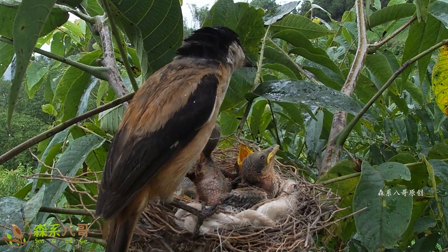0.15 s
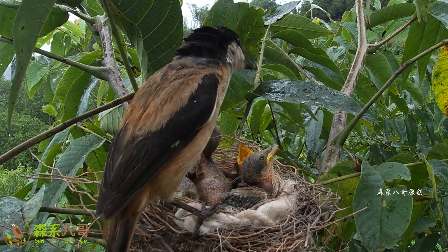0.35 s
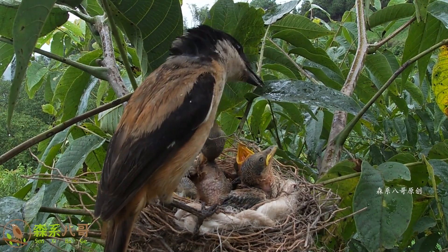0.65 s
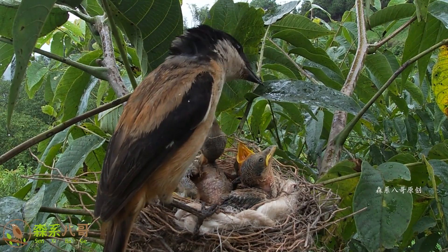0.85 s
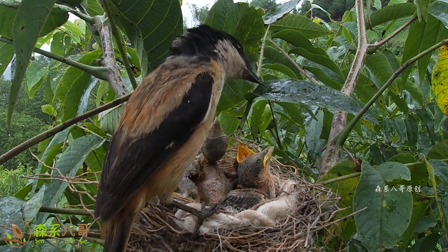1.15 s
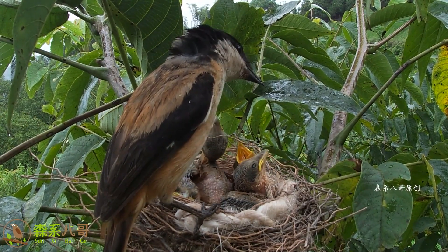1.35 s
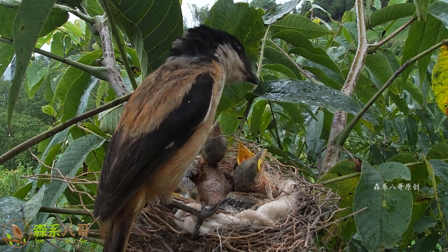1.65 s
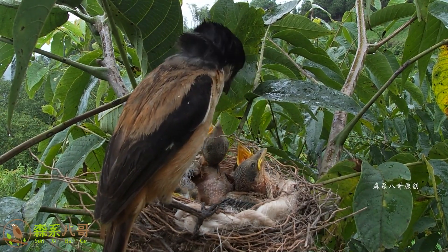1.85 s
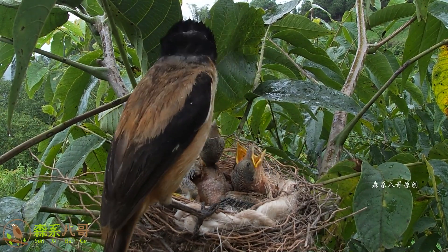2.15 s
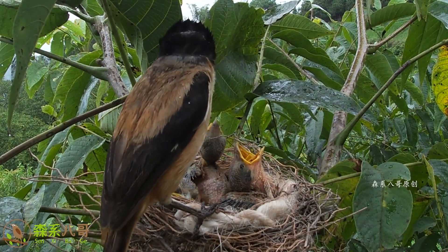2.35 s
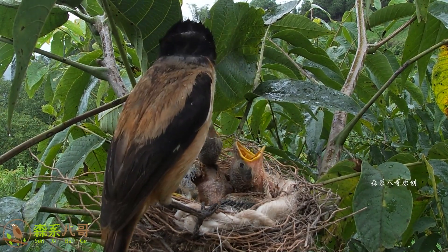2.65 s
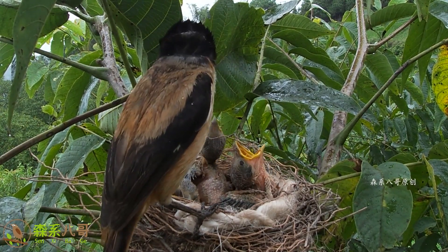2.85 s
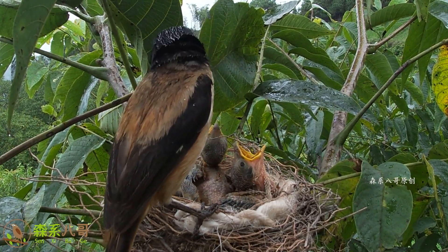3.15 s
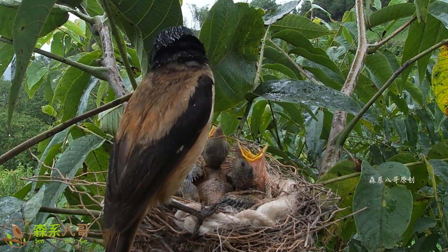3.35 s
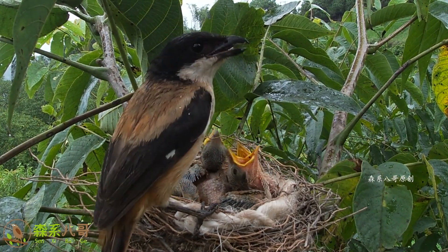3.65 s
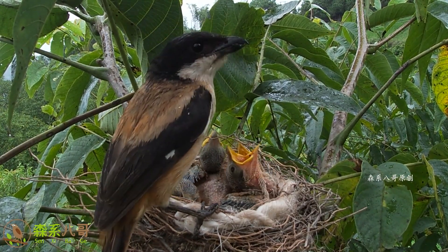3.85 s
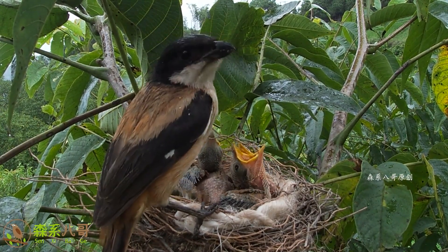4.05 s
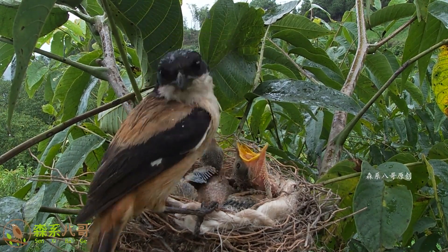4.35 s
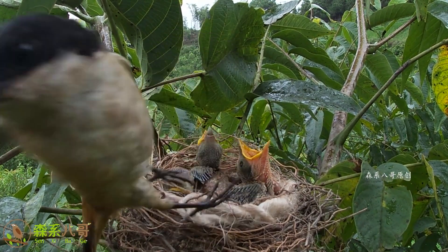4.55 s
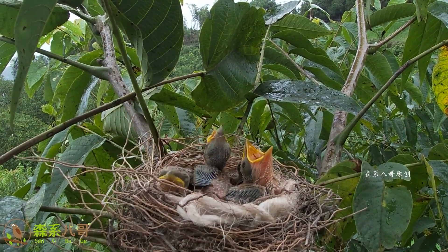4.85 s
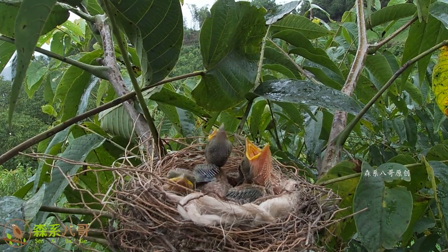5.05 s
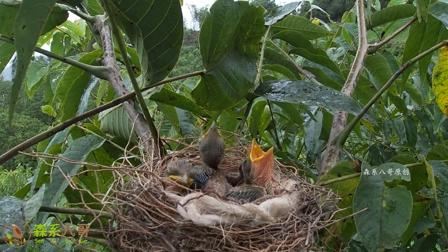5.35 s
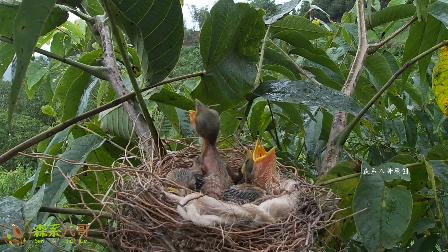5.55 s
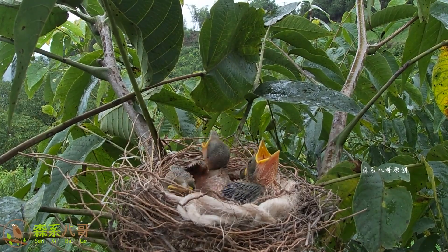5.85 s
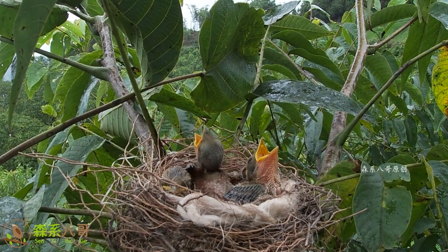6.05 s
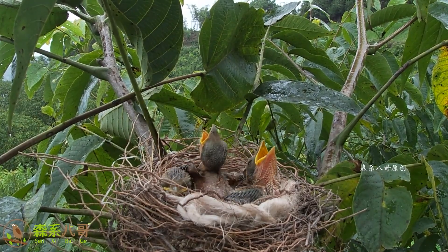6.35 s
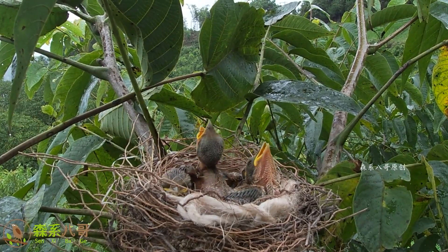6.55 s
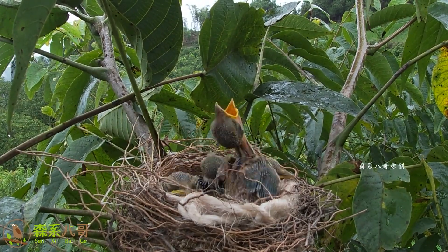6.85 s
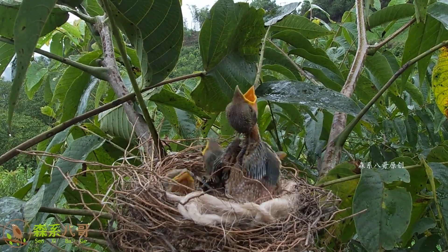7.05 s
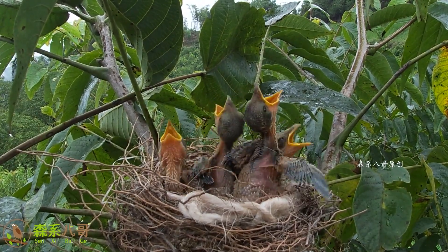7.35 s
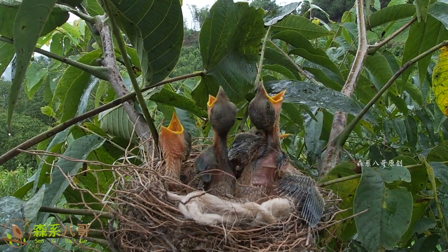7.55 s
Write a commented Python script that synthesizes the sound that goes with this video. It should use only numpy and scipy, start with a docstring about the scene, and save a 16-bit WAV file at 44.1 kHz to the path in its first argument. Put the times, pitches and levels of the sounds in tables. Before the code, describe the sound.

Several nestlings cheep shrilly and continuously in overlapping arched whistles, while a parent's departure brings hard mount knocks and a low wing buffet.

```python
"""Nestlings begging in a tree

Several thin whistles arch up and fall, overlapping: gliding sines with an octave partial and breath noise.
The parent leaves: low noise and damped swings buffet the microphone, the branch knocks the camera mount
(damped modes) and the mount shudders (low noise). Twigs and wings tick as short grains, a far bird holds
one note; foliage echoes the whistles, the ticks and the far bird, over a hiss and a low drone of noise."""
import sys
import numpy as np
from scipy import signal
from scipy.fft import rfft, irfft, next_fast_len
from scipy.io import wavfile
from scipy.ndimage import uniform_filter1d, map_coordinates

SR = 44100
rng = np.random.default_rng(int(sys.argv[2]) if len(sys.argv) > 2 else 0)


def bounce(signal):
    """Save signal as a 16-bit WAV file at the path given by the first command-line argument."""
    frames = np.transpose(np.atleast_2d(signal))
    limited = np.clip(frames, -1, 1)
    pcm = np.round(limited * 32767).astype(np.int16)
    wavfile.write(sys.argv[1], SR, pcm)


N = 340011

# Outdoor levels. Each row: time in seconds, drone level in dB, hiss level in dB.
OUTDOOR_LEVELS = [(0.0, -62, -51.5), (7.56, -83.5, -53), (7.71, -76, -55.5)]
# Hiss spectrum. Each row: frequency in Hz, relative density in dB per Hz.
HISS_SPECTRUM = [(24, -45), (40, 0), (86, -19.5), (145, 2.5), (298, -5.5), (527, -6), (804, 0.5),
                 (1490, 1.5), (3300, 0), (4130, -3), (5290, -5), (9360, -11.5), (10900, -27.5),
                 (12600, -30.5), (15000, -49)]
# Far bird's note. Each row: time in seconds, level in dB.
FAR_BIRD_LEVEL = [(5.94, -70), (5.96, -58), (6.08, -58), (6.11, -86)]
# Clear ticks: twig snaps, and three of wing rustle near 4.67 s.
# Each row: start in seconds, relative level in dB, centre in Hz.
CLEAR_TICKS = [(0.622, -33, 5500), (0.7028, -30, 2800), (1.3707, -31, 5500), (1.8514, -37, 1680),
               (2.0448, -37, 2090), (2.2255, -33, 5440), (3.0759, -38.5, 1636), (4.7463, -33, 6000),
               (4.467, -32.5, 2950), (4.637, -40.5, 1300), (4.668, -37.5, 990), (4.697, -40, 1200),
               (5.172, -36.5, 2100), (0.681, -36, 2820), (2.236, -30.5, 3030), (2.701, -35.5, 2500),
               (5.5758, -39.5, 1320), (6.1469, -38.5, 1600), (6.2213, -39.5, 1660), (7.054, -40.5, 1200)]
# Air on the microphone. Each row: time in seconds, level in dB.
BUFFET_LEVEL = [(4, -84), (4.9, -38.5), (5.5, -57.5), (5.9, -57.5), (6.5, -79), (7.2, -68), (7.71, -51)]
# Single pushes of air. Each row: start in seconds, relative level in dB.
AIR_PUSHES = [(4.66, -31), (4.739, -33), (4.898, -30.5), (5.03, -23.5), (5.071, -24.5), (6.9, -50),
              (7.167, -42.5), (7.41, -53), (7.535, -39.5), (7.572, -35)]
# Two spells of mount shudder, a list each. Each row: time in seconds, level in dB.
SHUDDER_SPELLS = [
    [(4.62, -66), (4.7, -49.5), (4.86, -37.5), (4.97, -58), (5.05, -46.5), (5.16, -49), (5.45, -64)],
    [(7.47, -64.5), (7.55, -50.5), (7.71, -61.5)],
]
# Blows on the mount. Each row: start in seconds, relative level in dB, bright modes in dB, deep modes in dB.
MOUNT_BLOWS = [(0.244, -42, -5, -8), (0.389, -48, 9.5, -26), (1.034, -42, -14, -8.5),
               (2.231, -37.5, -0.5, -18), (2.703, -37, 5.5, -20), (4.203, -61.5, -10, 18),
               (4.783, -20.5, 1, 2), (4.842, -27, -6, 1), (4.863, -31.5, -4, 3.5), (4.883, -35, 2, -12),
               (4.934, -40, -4, -8), (5.003, -27, -12, 2), (7.467, -42, -19, -26)]
# Mount resonances. Each row: mean frequency in Hz, relative level in dB, t60 in seconds.
MOUNT_MODES = [(108.6, 9, 0.12), (243.6, -7, 0.19), (567, -2, 0.082), (701, -2, 0.069), (922, 1, 0.03),
               (1655, 2, 0.036), (1860, 6.5, 0.021)]
# Throat resonances. Each row: frequency in Hz, gain in dB.
THROAT_GAIN = [(2500, -8.5), (3000, -4.5), (3300, -4.5), (3650, -7), (4100, -3), (4700, -1), (5400, -5),
               (6000, -5), (6750, -9.5), (7150, -6), (8000, -13), (12000, -50)]
# Octave partial. Each row: frequency of the partial in Hz, strength in dB.
OCTAVE_GAIN = [(5000, -13), (6650, -10), (7050, -16), (7500, -17), (8000, -22), (12000, -65)]
# Breath spectrum. Each row: frequency in Hz, relative density in dB per Hz.
BREATH_SPECTRUM = [(2500, -18), (5000, 1), (7600, -3), (9000, -43)]
# Vocal strain. Each row: time in seconds, pitch slipping 0-1, noise share 0-1.
VOICE_STRAIN = [(0.9, .35, .25), (1.3, 1, .3), (2.95, .65, .3), (3.1, .3, .25), (7.2, .4, .25),
                (7.35, .4, .38)]
# Arch shape of the high strokes. Each row: time in seconds, factor on their bends (more = flatter top).
BEND_FACTOR = [(4.9, 1), (5.05, 1.36), (6.8, 1.4), (7, 0.6)]
# Whistled strokes: whole cheeps, pieces of odd-shaped cheeps, and faint lines above them.
# Each row: start in seconds, rise in seconds, fall in seconds, first, top and last pitch in Hz,
# first and last level in dB before the voice's gains.
STROKES = [ (.005, 0.021, 0.069, 4400, 5570, 2860, -48.5, -51.5),
           (.106, 0.039, .003, 2610, 3860, 3900, -48, -55), (.14, 0.027, 0.044, 5360, 5830, 3570, -57, -47),
           (.24, 0.029, 0.072, 4500, 5710, 2930, -51, -52), (.269, .004, 0.014, 7400, 7440, 7360, -46, -50),
           (.348, 0.036, 0.036, 5470, 5780, 3200, -58, -52),
           (.416, 0.018, 0.0034, 2620, 3404, 3380, -45, -55),
           (0.479, 0.048, 0.062, 4980, 6000, 2990, -49, -48),
           (0.539, 0.0032, 0.019, 3500, 3540, 2900, -44, -55),
           (0.999, 0.0167, .003, 3020, 3600, 3600, -54, -45),
           (.575, 0.03, 0.053, 5780, 5830, 5170, -55, -52.5),
           (.698, 0.036, 0.052, 5100, 6075, 3107, -45.5, -48.5),
           (.749, .018, .003, 2800, 3440, 3440, -44, -61), (.818, 0.043, .037, 5560, 5840, 5230, -57, -54),
           (0.903, 0.043, 0.054, 4300, 5740, 3050, -45.5, -49),
           (1.068, 0.029, 0.039, 3820, 6000, 5240, -59, -52),
           (1.128, 0.026, 0.055, 5470, 5600, 3170, -50, -48.5),
           (1.128, 0.033, .005, 6760, 6900, 6890, -57, -54),
           (1.27, 0.029, .003, 2580, 3810, 3750, -46, -51),
           (1.349, 0.038, 0.039, 4340, 5650, 4850, -50, -45.5),
           (1.433, .014, 0.042, 5100, 5300, 3210, -46, -48),
           (1.44, .003, 0.037, 7050, 6900, 5710, -54, -53),
           (1.548, 0.031, 0.032, 5000, 5670, 5360, -60, -54),
           (1.625, 0.029, 0.087, 4880, 5510, 3150, -51, -49.5),
           (1.791, 0.034, 0.062, 5450, 5790, 3700, -55.5, -53),
           (1.889, 0.015, 0.089, 5330, 5450, 3220, -51, -49),
           (2.028, 0.035, 0.045, 5430, 5680, 5300, -53, -52),
           (2.146, 0.048, 0.094, 4300, 5820, 3150, -47, -50), (2.27, .02, .07, 5600, 5760, 4960, -55, -59),
           (2.393, 0.021, 0.1, 5280, 6030, 3220, -48, -46),
           (2.399, 0.022, .003, 6780, 7480, 7520, -42, -58),
           (2.613, 0.0037, 0.027, 3170, 3154, 3240, -45, -45),
           (2.644, .021, .003, 3340, 3970, 4000, -43, -59),
           (2.642, 0.034, 0.082, 4590, 5780, 3200, -47.5, -43.5),
           (2.82, .028, 0.045, 5300, 5740, 5330, -59.5, -54),
           (2.875, 0.022, 0.082, 5170, 5240, 3200, -49, -45.5),
           (2.856, 0.03, 0.0025, 3220, 5230, 5290, -47.5, -57),
           (3.117, .056, .076, 4300, 6020, 3150, -47.5, -45),
           (3.128, 0.077, 0.038, 2990, 3454, 3120, -44, -49),
           (3.289, .075, .02, 4350, 5015, 4950, -54, -58), (3.4, .03, .07, 5000, 5080, 5270, -51, -56),
           (3.385, 0.016, 0.11, 4560, 5480, 3150, -48, -52),
           (3.417, 0.069, 0.019, 2790, 3390, 3000, -48.5, -46.5),
           (3.652, 0.035, 0.096, 4380, 5750, 3150, -47, -50.5),
           (3.66, 0.024, .003, 6560, 6800, 6800, -53, -56),
           (3.715, 0.069, 0.054, 2680, 3580, 2950, -48, -42.5),
           (3.903, 0.027, 0.022, 4250, 5740, 4900, -51, -52),
           (3.947, .003, 0.037, 4950, 4880, 4295, -56, -51),
           (4.015, 0.086, 0.04, 2660, 3580, 2890, -45.5, -49),
           (4.0, .003, 0.014, 3500, 3500, 2750, -53, -48),
           (4.183, 0.036, 0.051, 4020, 5040, 4550, -54.5, -59),
           (4.274, 0.038, .017, 4570, 4920, 4500, -61, -49),
           (4.308, 0.069, 0.032, 2885, 3755, 3380, -44, -48),
           (4.545, 0.024, 0.055, 5120, 6000, 4550, -47.5, -54),
           (4.554, 0.059, 0.053, 2680, 3520, 2970, -49.5, -45),
           (4.68, 0.0028, 0.02, 3100, 3130, 2900, -48, -46.5),
           (4.798, .003, 0.027, 4820, 4900, 4530, -52, -57),
           (4.826, .041, 0.049, 4540, 4710, 4230, -60, -59),
           (4.84, 0.045, 0.061, 2690, 3310, 2800, -43.5, -52),
           (4.95, 0.0028, 0.028, 3350, 3320, 3060, -47, -54),
           (5.06, 0.058, 0.053, 4260, 6100, 4530, -57, -54),
           (5.112, .04, 0.026, 2610, 3830, 3450, -45.5, -51),
           (5.177, .003, 0.046, 3350, 3370, 3340, -50, -58),
           (5.234, .003, 0.013, 3020, 3020, 2900, -49, -48),
           (5.31, 0.08, 0.043, 3750, 6300, 5070, -55.5, -55),
           (5.432, .003, .04, 5000, 5000, 4470, -58, -59), (5.405, 0.11, 0.036, 2550, 3520, 2900, -50, -52),
           (5.557, 0.0134, 0.0025, 3660, 3890, 3890, -50, -46),
           (5.688, 0.0025, 0.046, 4820, 4730, 4060, -55, -50),
           (5.724, 0.052, .035, 2790, 3750, 2950, -41, -55),
           (5.85, 0.02, 0.049, 5830, 6560, 4900, -50.5, -51),
           (5.917, 0.0032, 0.014, 3870, 3820, 3400, -44, -47),
           (5.978, 0.052, .065, 2740, 3930, 3460, -45.5, -53),
           (6.222, .05, .066, 3700, 6250, 3300, -52, -60), (6.2, .003, 0.011, 3050, 3080, 2900, -54, -54),
           (6.245, 0.034, 0.047, 2500, 3690, 2780, -46, -48.5),
           (6.425, .062, .04, 3680, 6280, 3600, -54.5, -44),
           (6.532, 0.0029, .03, 3400, 3400, 2600, -52, -50),
           (6.556, .038, 0.027, 2720, 3810, 2950, -41, -49),
           (6.644, 0.044, .06, 3730, 5910, 3590, -53.5, -52),
           (6.879, .014, .003, 3200, 3960, 3950, -44, -42),
           (7.075, 0.081, 0.069, 3020, 3560, 2830, -50, -46),
           (7.09, 0.018, .005, 6600, 6520, 6600, -49, -49),
           (7.34, 0.034, 0.011, 4400, 4870, 4600, -56, -58),
           (7.116, 0.08, 0.039, 4060, 4450, 3200, -56, -52), (7.3, 0.0098, .04, 3900, 4100, 3900, -50, -57),
           (7.338, 0.0037, .008, 3050, 3340, 3180, -50, -54),
           (7.345, 0.067, 0.033, 3940, 4240, 3200, -53, -48.5),
           (7.378, 0.0027, .03, 5250, 5170, 5000, -55, -56),
           (7.379, .003, 0.029, 3750, 3800, 2810, -50, -51),
           (7.443, .006, 0.027, 7100, 7470, 6930, -52, -57),
           (7.405, 0.073, 0.016, 5000, 6670, 5500, -56, -51),
           (7.428, 0.0085, 0.019, 2370, 2970, 2650, -41.5, -48),
           (7.5, 0.014, 0.0027, 3210, 3970, 4050, -48, -53),
           (7.555, 0.017, .018, 2690, 3510, 3000, -47, -52),
           (7.569, .003, 0.065, 4950, 4900, 4630, -53, -50),
           (7.58, 0.033, .003, 4920, 6300, 6300, -51, -47),
           (7.612, 0.0034, 0.028, 7040, 6800, 5200, -55, -43),
           (7.685, 0.015, .003, 3340, 4290, 4400, -44, -53),
           (7.65, .016, 0.015, 2310, 2930, 2700, -43, -44.5),
           (7.66, .003, 0.014, 5880, 5880, 5700, -51, -55), ]

TOP_HZ = 15000
HIGH_STROKE_HZ = 4500  # a stroke topping this is a high one
HOOK_S, HOOK_SAG_HZ = 0.0056, 198  # tail after a long drop
# 1 = straight glide, more = rounder top; BEND_FACTOR scales the high rise and the plunge
RISE_BEND_HIGH, RISE_BEND_LOW, FALL_BEND, PLUNGE_BEND = 2.6, 1.6, 1.8, 3.6
BREAK_HZ, BREAK_WIDE_HZ, BREAK_DB = 3850, 260, -7  # band where a falling high stroke weakens
HIGH_OCTAVE_DB = -2.5  # high strokes are purer
EDGE_S = .003  # soft start and end of a stroke


def amp(db):
    """dB to gain."""
    return 10 ** (np.asarray(db) / 20)


def unit(x):
    """x at rms 1."""
    return x / np.sqrt(np.mean(x ** 2) + 1e-20)


def along(points, hz):
    """(Hz, value) points read on a log axis."""
    f, v = np.transpose(points)
    return np.interp(np.log(hz + 1), np.log(f + 1), v)


def curves(rows):
    """One value per sample for each column after the time."""
    s, *cols = np.transpose(rows)
    return [np.interp(np.arange(N) / SR, s, c) for c in cols]


def wobble(rate_hz):
    """A smooth random curve, rate_hz knots a second."""
    knots = rng.standard_normal(int(N * rate_hz / SR) + 4)
    return map_coordinates(knots, [np.arange(N) * rate_hz / SR])


def filtered(x, response):
    """x times a response of frequency."""
    m = next_fast_len(N + 8192)
    return irfft(rfft(x, m) * response(np.fft.rfftfreq(m, 1 / SR)), m)[..., :N]


def noise(spectrum):
    """Coloured noise of rms 1; its spectrum falls to -120 dB an octave beyond either end."""
    closed = [(spectrum[0][0] / 2, -120), *spectrum, (spectrum[-1][0] * 2, -120)]
    return unit(filtered(rng.standard_normal(N), lambda hz: amp(along(closed, hz))))


def outdoors():
    """Wide hiss of leaves and distance, and a narrow low drone: two shaped noises."""
    drone_db, hiss_db = curves(OUTDOOR_LEVELS)
    hiss = amp(hiss_db + 0.039 * wobble(2.9) + 1.47 * wobble(30)) * noise(HISS_SPECTRUM)
    drone = noise([(110, -54), (135, -3.0), (160, -6.5), (200, -13.5)])
    return hiss + amp(drone_db + 2.0 * wobble(9.3)) * drone


def far_bird(note_hz=5020):
    """A level, clean note from further off: one sine of slightly wavering level."""
    db, = curves([(5.92, -120), *FAR_BIRD_LEVEL, (6.14, -120)])
    return np.sqrt(2) * amp(db + 1.2 * wobble(80)) * np.sin(2 * np.pi * note_hz * np.arange(N) / SR)


def leaves(x, t60_s=0.037):
    """Scattered echo from the foliage around the nest: convolution with decaying noise."""
    t = np.arange(SR // 4) / SR
    tail = rng.standard_normal(len(t)) * amp(-60 * t / t60_s)
    return signal.fftconvolve(x, tail / np.linalg.norm(tail))[:N]


def ticks(rate_hz=120, small_db=-62, spread_db=5.0, treble_db=4):
    """Clear ticks over a random crackle of short damped grains with rounded starts."""
    count = int(rate_hz * N / SR)
    when, strength, pitch = rng.random((3, count))
    crackle_db = small_db - spread_db * np.log(.03 + strength) + treble_db * pitch
    crackle = np.c_[when * N / SR, crackle_db, 450 * 23 ** pitch]
    s, db, hz = np.vstack([CLEAR_TICKS, crackle]).T[:, :, None]
    step = np.arange(256)
    cycles = step / SR * hz
    grains = amp(db + 22.0) * cycles * np.exp(-cycles / 0.29) * np.sin(2 * np.pi * cycles)
    where = np.round(s * SR).astype(int) + step
    summed = np.bincount(where.ravel(), grains.ravel(), N + 256)[:N]
    return filtered(summed, lambda hz: 1 / (1 + (hz / 11000) ** 8))


def wing_buffet(sway_hz=23, t60_s=0.18):
    """Air from the wings and the swaying branch push on the microphone: low noise and damped swings."""
    level_db, = curves(BUFFET_LEVEL)
    push = amp(level_db) * noise([(12, 0.5), (24, -0.5), (45, -15), (90, -26)])
    t = np.arange(SR // 4) / SR
    for s, db in AIR_PUSHES:
        envelope = amp(db + 10.5 - 60 * t / t60_s) * (1 - np.exp(-t / 0.037))
        swing = -envelope * np.sin(2 * np.pi * sway_hz * t)
        push[round(s * SR):][:len(t)] += swing[:N - round(s * SR)]
    return push


def mount_shudder(beat_hz=19, beat_s=4.6, beat_db=6):
    """The mount shudders in its low modes, as noise that each wingbeat jolts anew."""
    first, last = SHUDDER_SPELLS
    level_db, = curves([(4.55, -120), *first, (5.6, -120), (7.4, -120), *last])
    shudder = noise([(60, -1.5), (160, -4.0), (195, -6.5), (235, -8.5), (300, -20.0), (700, -24.5)])
    # the nestlings' jostling at the end favours the higher modes
    jostle = noise([(90, -20), (160, 3), (195, -18), (235, 5.5), (300, -24), (700, -21)])
    beat = np.cos(2 * np.pi * beat_hz * (np.arange(N) / SR - beat_s))
    lumps = amp(3.1 * wobble(25) + beat_db * beat)
    return amp(level_db) * unit(lumps * np.where(np.arange(N) < 7 * SR, shudder, jostle))


def knocks(scrape_db=-9.5, scrape_t60_s=0.069):
    """Every blow rings the mount at new strengths over a short scrape; a mode builds up in about a cycle."""
    rings, scrape, t = np.zeros(N + SR), np.zeros(N + SR), np.arange(SR // 4) / SR
    for s, db, bright_db, deep_db in MOUNT_BLOWS:
        first = round(s * SR)
        scrape[first:][:len(t)] += amp(db + scrape_db - 60 * t / scrape_t60_s) * (1 - np.exp(-t / 0.0064))
        for hz, level_db, t60_s in MOUNT_MODES:
            share_db = deep_db if hz < 300 else bright_db if hz > 1300 else 0
            chance_db = rng.normal(0, 2.5 if hz > 300 else 1)
            ring_db = db + share_db + level_db - 7.5 + chance_db
            ring = amp(ring_db - 60 * t / t60_s) * (1 - np.exp(-t * hz / 0.96))
            rings[first:][:len(t)] += ring * np.sin(2 * np.pi * hz * rng.normal(1, 0.03) * t)
    rough = amp(4.3 * wobble(250)) * noise([(250, -1.0), (650, -1), (1500, -13.0)])
    return rings[:N] + scrape[:N] * rough


def arch(start_s, rise_s, fall_s, first_hz, top_hz, last_hz):
    """Samples and pitch of a stroke: up to a rounded top, then an ever steeper fall; long drops linger."""
    plunges = top_hz - last_hz > 2000
    end_s = start_s + rise_s + fall_s + HOOK_S * plunges
    n = np.arange(round(start_s * SR), min(round(end_s * SR), N))
    t = n / SR - start_s - rise_s  # 0 at the top
    factor = np.interp(start_s, *np.transpose(BEND_FACTOR))
    rise_bend = factor * RISE_BEND_HIGH if top_hz > HIGH_STROKE_HZ else RISE_BEND_LOW
    fall_bend = factor * PLUNGE_BEND if plunges else FALL_BEND
    up = (top_hz - first_hz) * np.clip(-t / max(rise_s, 1e-3), 0, 1) ** rise_bend
    down = (top_hz - last_hz) * np.clip(t / max(fall_s, 1e-3), 0, 1) ** fall_bend
    return n, top_hz - up - down - HOOK_SAG_HZ * np.maximum(t - fall_s, 0) / HOOK_S


def chicks(side_db=-20, side_hz=1400, saw_hz=62, saw_depth=0.078, rasp_db=-12, fall_hz_per_s=60000,
           pop_db=5, start_db=9, fading_db=-6):
    """Each stroke is an unsteady whistle with its octave; where the pitch drops fast the voice turns breathy."""
    voice, breath = np.zeros(N), np.zeros(N)
    slipping, hoarse = curves(VOICE_STRAIN)
    # the level dips for a few milliseconds, to a fifth at the lowest
    breaks = np.clip(2.6 + 1.5 * wobble(200), .2, 1)
    flutter = amp(1.5 * wobble(110) + 1.2 * wobble(45)) * breaks * (1 + hoarse * wobble(700))
    patchy = amp(3 * wobble(90)) * (1 + .4 * wobble(600))
    # the pitch slips down and snaps back, again and again
    saw = .5 - np.cumsum(saw_hz * amp(2 * wobble(20))) / SR % 1
    drift = .011 * wobble(180) + .01 * wobble(70) + saw_depth * saw * slipping
    for *shape, first_db, last_db in STROKES:
        n, hz = arch(*shape)
        high = hz.max() > HIGH_STROKE_HZ
        glide = uniform_filter1d(hz, size=150, mode="nearest")
        slope = np.gradient(glide)
        falling = np.clip(-slope * SR / fall_hz_per_s, 0, 1)
        edges = np.clip(np.minimum(n - n[0], n[-1] - n) / (EDGE_S * SR), 0, 1)
        effort = edges * amp(np.linspace(first_db, last_db, len(n)))
        waver = drift[n] * np.minimum(glide / 5500, 1) ** 2  # low notes waver least
        phase = 2 * np.pi * np.cumsum(glide * (1 + waver)) / SR
        # the whistle swells where it crosses a resonance
        tone = amp(along(THROAT_GAIN, glide)) * flutter[n] * np.sin(phase)
        octave_db = HIGH_OCTAVE_DB * high + along(OCTAVE_GAIN, 2 * glide)
        octave = amp(octave_db) * patchy[n] * np.sin(2 * phase)
        octave *= amp(fading_db * (slope < 0))  # thins past the top
        # a slower second oscillation puts a line above the high whistles, most as they fall
        side = amp(side_db) * (glide > 4300) * (0.52 + falling) * patchy[n]
        side = side * np.sin(phase + 2 * np.pi * side_hz * n / SR)
        # the end of a high stroke's drop rings the lowest throat resonance
        accent = 1 + high * amp(pop_db) * np.exp(-((glide - 3200) / 350) ** 2)
        # it weakens as it falls through the break band and blurts as it rises through it
        in_break = np.exp(-((glide - BREAK_HZ) / BREAK_WIDE_HZ) ** 2)
        accent *= amp(BREAK_DB * high * (falling > 0) * in_break)
        accent += high * (falling == 0) * amp(start_db) * in_break
        voice[n] += np.sqrt(2) * effort * (accent * tone + octave + side)
        breath[n] += effort * amp(rasp_db) * (falling + hoarse[n] ** 2)
    return voice + breath * amp(5.0 * wobble(300)) * noise(BREATH_SPECTRUM)


def scene():
    """All sources at one microphone."""
    airborne = far_bird() + ticks() + chicks()
    echo = amp(-2.5) * leaves(airborne)
    return (outdoors() + echo + wing_buffet() + mount_shudder() + knocks() + airborne)[None]


def record(dry):
    """The camera keeps nothing above its band limit."""
    return filtered(dry, lambda hz: hz < TOP_HZ)


dry = scene()
out = record(dry)
bounce(out)
```